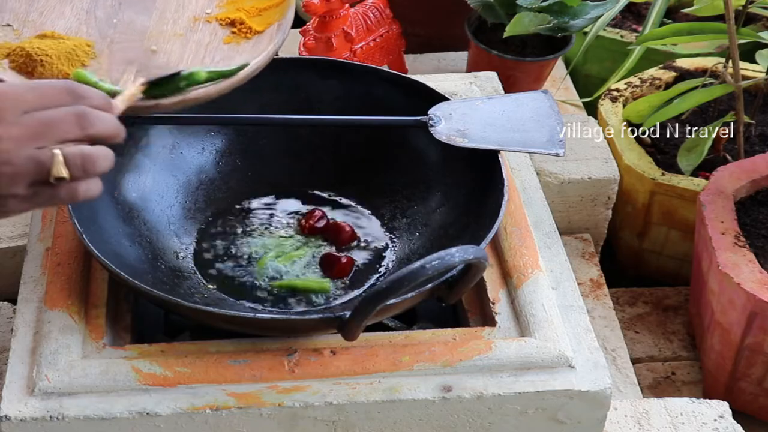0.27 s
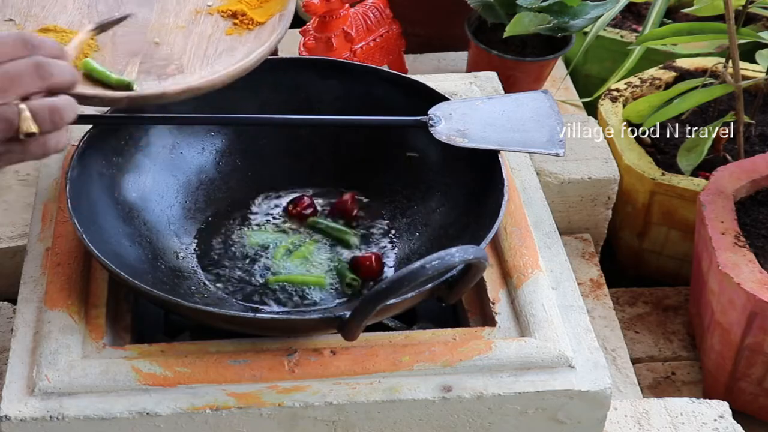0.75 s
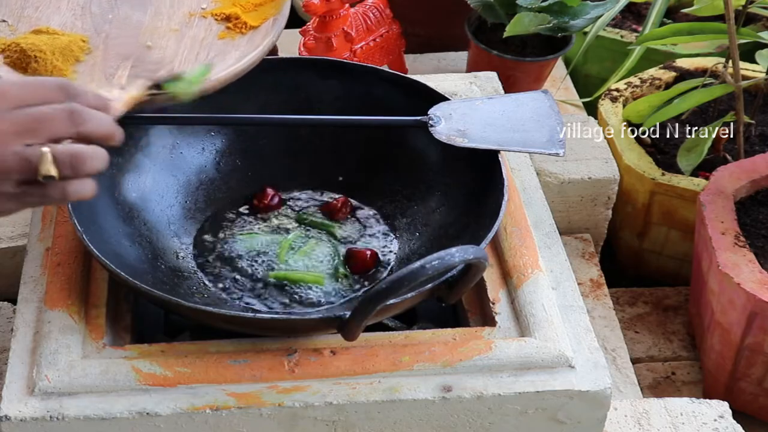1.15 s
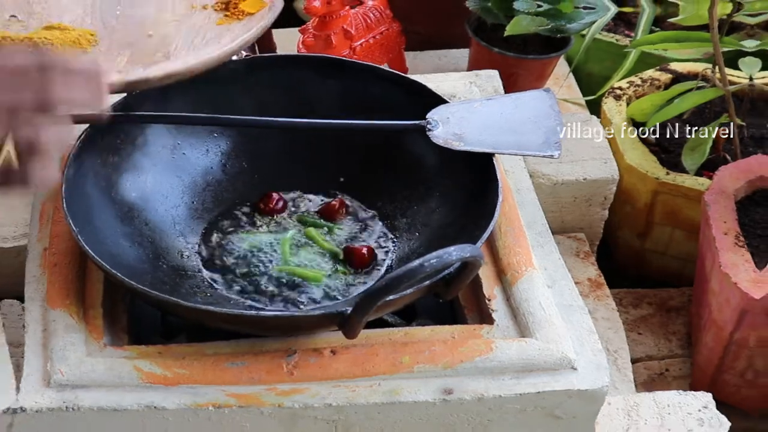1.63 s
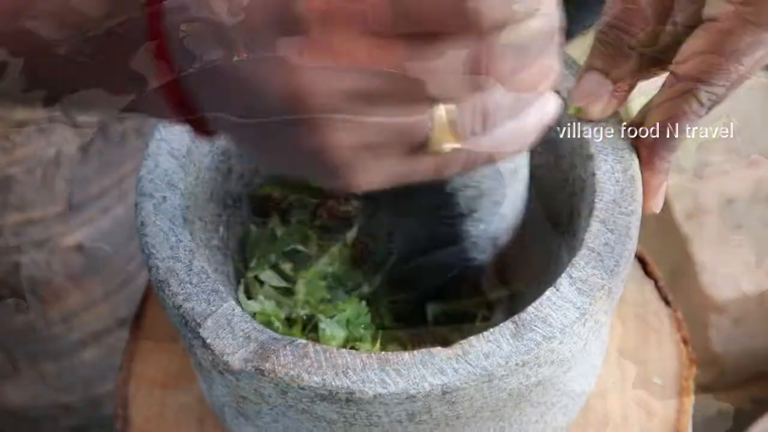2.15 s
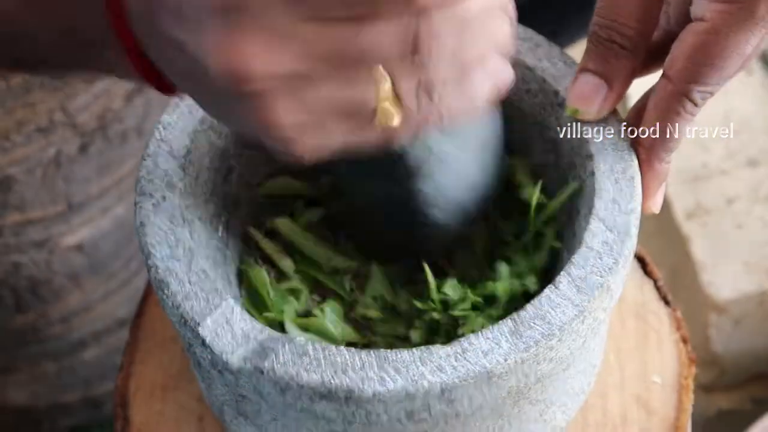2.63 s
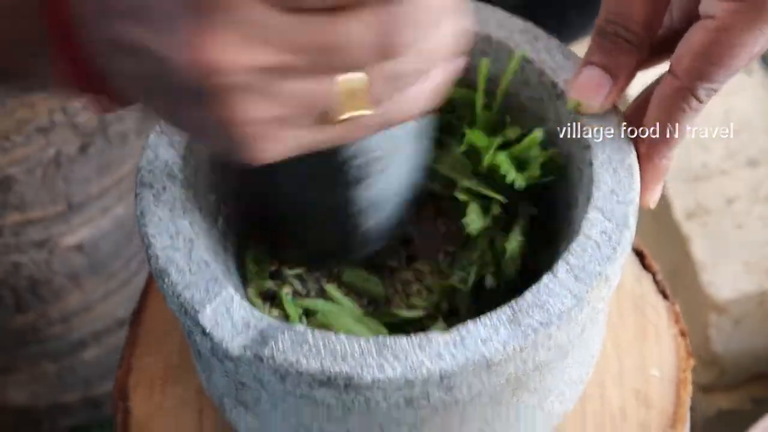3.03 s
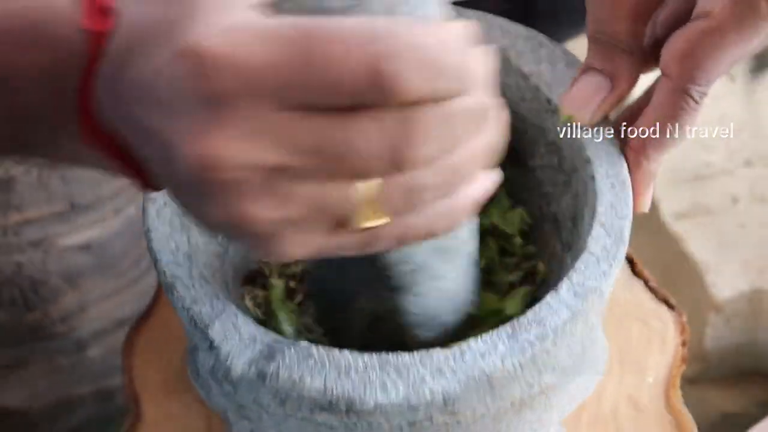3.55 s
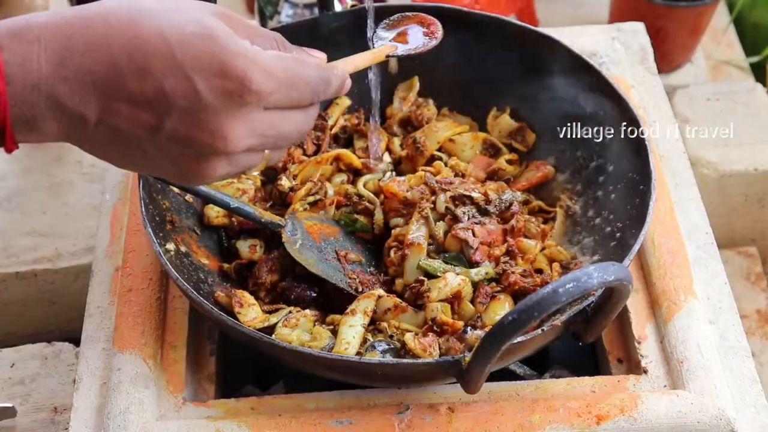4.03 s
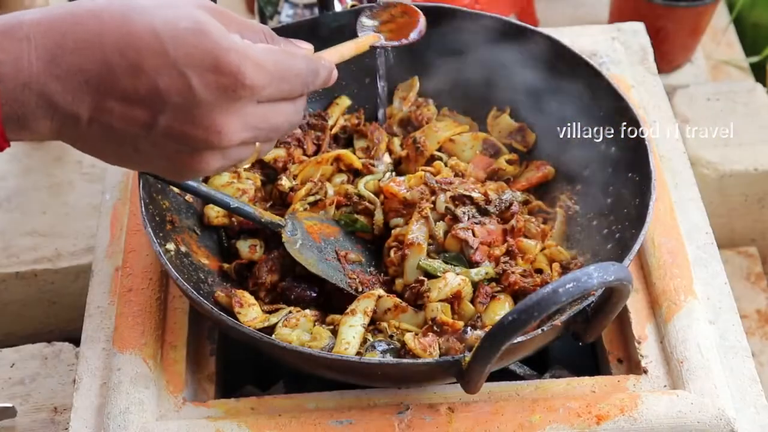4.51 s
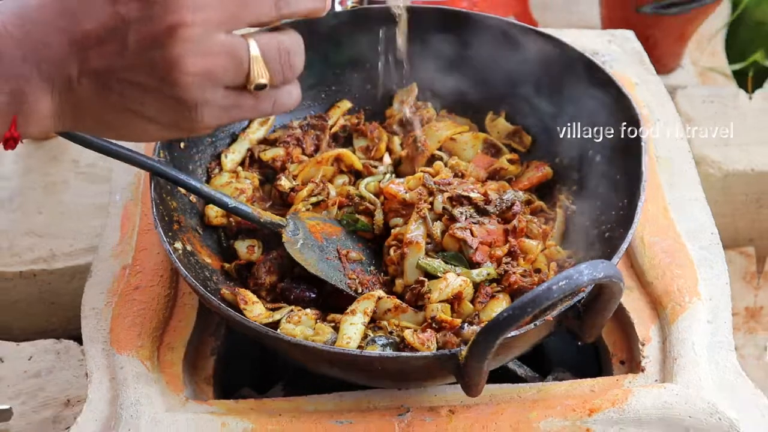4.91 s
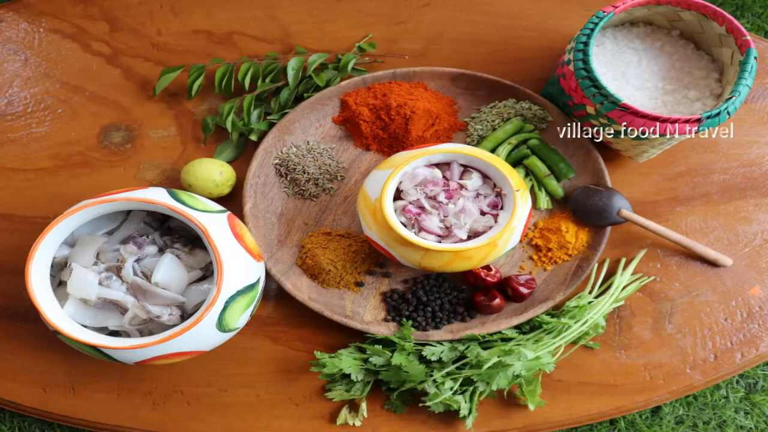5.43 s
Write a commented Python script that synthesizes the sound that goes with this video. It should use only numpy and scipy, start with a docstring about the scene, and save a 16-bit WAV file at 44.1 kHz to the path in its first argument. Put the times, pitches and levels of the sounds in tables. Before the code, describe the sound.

A close stereo microphone in an open yard first catches fine sizzling and dozens of hard, ringing pops, with two wooden taps and short squeaky drags over faint engine throbbing. A dissolve brings slow pestle blows, first dull and leafy, then hard ringing stone, clipping the microphone. Finally a dense steam hiss swells in, stays steady and fades into near silence.

```python
"""Chillies spit in hot oil in an iron wok: noise-burst sizzle plus ringing pops. A spoon taps and drags on
a wooden plate (struck modes, squeak) while something like a small engine throbs far away (a boom per firing).
Then a stone pestle pounds herbs in a mortar (crunch noise, struck modes), hard enough to overload the
microphone. Last, water poured into the hot wok hisses (three bands of noise bursts) and fades out.
Rumble, air, a drone and a hum lie behind. All three scenes are outdoors and dissolve into one another."""
import sys
import numpy as np
from scipy import signal
from scipy.fft import rfft, irfft, next_fast_len
from scipy.io import wavfile

SR = 44100
rng = np.random.default_rng(int(sys.argv[2]) if len(sys.argv) > 2 else 0)


def generate_wav(sig):
    """Save sig (samples, or channels by samples) to the path in sys.argv[1] as 16-bit PCM at SR."""
    pcm = np.round(np.clip(np.atleast_2d(sig).T, -1, 1) * 32767).astype(np.int16)
    wavfile.write(sys.argv[1], SR, pcm)


N = 250124
T = np.arange(N) / SR

# Scene dissolves: start and end in seconds.
TO_MORTAR_S, TO_WATER_S, FADE_OUT_S = (1.71, 2.42), (3.565, 4.21), (4.857, 5.347)
TOP_HZ = 15900

# Side relative to mid at the microphone pair. Each row: frequency in Hz, level in dB.
WIDTH_HZ_DB = [(60, -15.5), (250, -12.5), (1000, -9), (4000, -6.5), (8000, -4.5), (13000, -2)]

# Outdoor background, one row per scene (frying, mortar, pouring): rumble in dB, air in dB.
YARD_DB = [(-56, -46.5), (-54, -49.5), (-61, -49)]
# Spectrum of the low rumble. Each row: frequency in Hz, relative level in dB.
RUMBLE_HZ_DB = [(15, 6), (30, 7.5), (55, 7.5), (75, 0.5), (105, 5), (140, -10.5), (250, -46.5)]
# Spectrum of the open air. Each row: frequency in Hz, relative level in dB.
AIR_HZ_DB = [(60, -20.5), (110, -4.5), (200, -4.5), (300, -4.5), (380, -9), (500, -4.5), (800, -8.5),
             (1500, -9), (4000, -38)]
# Gusts of low rumble. Each row: centre in seconds, length in seconds, level in dB.
GUSTS = [(.9, .3, -51), (1.9, .08, -45), (2.25, 0.31, -40), (2.58, 0.22, -38.5), (2.97, 0.099, -44.5),
         (3.45, .2, -51)]
# Swell of a faint distant drone. Each row: centre in seconds, length in seconds, level in dB.
DRONE_SWELLS = [(3.35, 0.45, -42)]
HUM_DB = -59.5

# Distant one-cylinder engine, gathering speed evenly.
FIRINGS_PER_S, SPEED_UP_PER_S2, ENGINE_DB = 20.3, 2.45, -36.5
ENGINE_AWAY_S = (1.61, 2.28)  # dies away: start, end
# The engine labours. Each row: centre in seconds, length in seconds, level in dB.
SURGES = [(1.06, 0.37, -33.5), (1.57, 0.19, -35)]

# Light wooden bump as the pouring starts.
BUMP_S, BUMP_DB = 3.922, -28.5
# The wooden block thumps low under two of the blows. Each row: start in seconds, level in dB.
THUMPS = [(2.524, -29.5), (3.133, -26)]
# Modes of the wooden block. Each row: frequency in Hz, relative level in dB, t60 in seconds.
BLOCK_MODES = [(58, 2, 0.077), (105.4, -3, 0.045)]

# Spectrum of water flashing to steam. Each row: frequency in Hz, relative level in dB.
STEAM_HZ_DB = [(150, -33), (300, -35), (450, -18), (650, -14), (900, -11), (1200, -4.5), (1750, -4.5),
               (2100, -6), (2600, -1.5), (4200, -2), (6500, -5.5), (9400, -10), (11000, -18),
               (13000, -18.5), (15800, -30.5)]
# Iron wok resonances that colour the boiling. Each row: frequency in Hz, width in Hz, boost in dB.
WOK_PEAKS = [(666.5, 11, 12), (1175, 37, 4), (1520, 25, 4), (1820, 41, 6.5), (2376, 120, 4.5)]
# Steam layers: dB when the pour is in full flow, dB per s as water gathers.
SPRAY, SEETHE, BOIL = (-21, -0.76), (-26.5, 3.7), (-31, 4.8)

# Spectrum of rustling leaves. Each row: frequency in Hz, relative level in dB.
HERB_HZ_DB = [(120, -33.5), (200, 4), (490, -12), (567, -14), (848, 0), (1220, -7.5), (1440, -2),
              (4640, 2.5), (9820, -6.5), (15800, -22)]
# Rubs of the pestle through the herbs. Each row: centre in seconds, length in seconds, level in dB.
RUBS = [(2.515, 0.01, -31), (2.618, 0.038, -27.5), (2.69, 0.058, -38), (2.757, 0.019, -26),
        (2.85, 0.056, -34), (2.95, 0.036, -32), (3.005, 0.043, -33.5), (3.055, 0.033, -33),
        (3.115, 0.025, -35), (3.285, 0.055, -36), (3.36, 0.023, -30.5), (3.47, 0.08, -34),
        (3.64, 0.075, -40)]
# Stalks snapping under the pestle. Each row: start in seconds, level in dB.
SNAPS = [(2.716, -16), (3.4622, -12), (3.4947, -15.5)]
# Leaves stir faintly before they are bruised and audibly after.
FRESH_DB, BRUISED_DB, BRUISED_FROM_S = -60, -43.5, 2.51

# Pestle blows. Each row: start in seconds, leaf crunch in dB, cushioned thud in dB, stone clack in dB,
# pestle ring in dB, highest Hz that the leaf cushion passes, highest Hz of the clack.
BLOWS = [(2.0262, -6, -2.5, -42, -61, 955, 9000), (2.2586, -8, 0, -15, -61, 1700, 2000),
         (2.521, -6, -12.5, -62.5, -56, 445, 9000), (2.7592, -22, -11.5, 9, -19.5, 1600, 11000),
         (3.134, -29.5, -12, 8.5, -14, 2100, 13000), (3.531, -15, -10.5, 5.5, -26.5, 1250, 2400)]
# Modes of the mortar on its wooden block. Each row: frequency in Hz, relative level in dB, t60 in seconds.
THUD_MODES = [(157.8, -22, .12), (275, -5.5, 0.021), (392, -5, 0.027), (511, -8, 0.025), (871, -4, 0.016)]
# Modes of stone on stone. Each row: frequency in Hz, mean relative level in dB, t60 in seconds.
CLACK_MODES = [(736, -28, 0.034), (1250, -7, 0.015), (1383, -6, .018), (1525, -2.5, 0.015),
               (1642, -3, 0.014), (1817, -5, 0.016), (2130, -10.5, 0.014), (2620, -6.5, 0.0067),
               (4750, -17, 0.0059), (5480, -15.5, 0.012), (6460, -20.5, 0.019)]
# Modes of the pestle. Each row: frequency in Hz, relative level in dB, t60 in seconds.
PESTLE_MODES = [(3980, -6.5, 0.27), (3957, 11.5, 0.04)]

# Modes of the wooden plate. Each row: frequency in Hz, relative level in dB, t60 in seconds.
PLATE_MODES = [(871, -2, 0.087), (992, -2, .05), (1530, -1, 0.051), (1875, 0, 0.096), (2694, 12.5, 0.012),
               (3560, -3, 0.0077)]
# Spoon taps. Each row: start in seconds, level in dB.
TAPS = [(.212, -24), (0.5328, -21)]
# Drags of the spoon over the plate. Each row: centre in seconds, length in seconds, level in dB.
DRAGS = [(1.058, 0.027, -34), (1.105, .04, -38), (1.185, .04, -29.5), (1.297, .022, -31)]

# Spectrum of the sizzle. Each row: frequency in Hz, relative level in dB.
FRY_HZ_DB = [(200, -32.5), (400, -14.5), (650, -9.5), (1000, -15.5), (2000, -6.5), (3000, -4), (4300, 1),
             (6500, -2.5), (9000, -4.5), (11000, -11), (14000, -16.5), (16000, -33)]
# Loudest drops of moisture bursting in the oil. Each row: start in seconds, level in dB, pitch in Hz,
# width in Hz.
POPS = [(.0182, -8, 3270, 150), (.056, -6, 2180, 2000), (.06, -6.5, 4500, 600), (.1088, -6.5, 8000, 2320),
        (0.3447, -5.5, 2420, 745), (.351, 1.5, 4200, 1440), (.4321, 0, 3400, 1120),
        (.4655, -9.5, 2200, 694), (0.503, -6.5, 4740, 400), (0.5765, 2.5, 2190, 650),
        (0.7024, -8.5, 4200, 1094), (0.7108, -5.5, 3030, 448), (.7537, -9, 5980, 250),
        (0.8146, -6.5, 5030, 151), (0.834, -2, 5230, 2800), (0.8782, -3, 3450, 800), (.9, -6.5, 3100, 700),
        (1.0208, -4, 3840, 2000), (1.204, -10, 4700, 400), (1.2173, -4.5, 2960, 350),
        (1.305, -3.5, 4800, 1107), (1.311, 2.5, 4040, 800), (1.372, -4.5, 5250, 397),
        (1.4136, -4.5, 6200, 596), (1.5076, -2, 4200, 600), (1.5425, -4.5, 6650, 2510),
        (1.5688, -6, 4100, 1206), (1.6164, -3, 3900, 800), (1.66, -7.5, 2530, 704), (1.6998, -7, 3940, 550),
        (1.714, -6.5, 2480, 497), (1.779, -8.5, 3460, 550), (1.792, -4.5, 6330, 684),
        (1.8247, -1, 3960, 1400), (1.895, -7, 4000, 250), (1.914, -9.5, 2960, 353), (1.964, -7, 3980, 500),
        (2.0756, -12, 4060, 509), (2.1035, -12.5, 4000, 402), (2.1595, -12.5, 2860, 912)]
# Sizzle flares as wet chillies meet the oil. Each row: start in seconds, strength in dB before the sizzle trim.
FLARES = [(.01, -33), (.535, -24.5), (.69, -30), (.85, -23), (1.12, -28.5)]
SPICES_DB = -36  # strength without flares, before the sizzle trim
FLARE_ATTACK_S, FLARE_DECAY_S = 0.019, 0.056
SIMMER_DB, DRYING_S = -7.5, 4.4  # what lasts of each flare, and how slowly it dries up


def undb(db):
    """Decibels to gain."""
    return 10 ** (np.asarray(db) / 20)


def colour(x, points):
    """Filter by a (Hz, dB) spectrum, interpolated over log frequency."""
    hz, db = np.transpose(points)
    size = next_fast_len(N, True)
    bins_hz = np.maximum(np.fft.rfftfreq(size, 1 / SR), 1)
    gain = undb(np.interp(np.log(bins_hz), np.log(hz), db))
    return irfft(rfft(x, size) * gain, size)[..., :N]


def band(x, low_hz, high_hz):
    """Band-pass."""
    edges_hz = [low_hz, min(high_hz, .45 * SR)]
    return signal.sosfilt(signal.butter(2, edges_hz, 'band', fs=SR, output='sos'), x)


def unit(x, low_hz, high_hz):
    """Scale so that this band of the centre has rms 1."""
    centre = np.atleast_2d(x).mean(axis=0)
    return x / band(centre, low_hz, high_hz).std()


def walk(knots_per_s):
    """Random drift, spread near 1, straight between knots."""
    knots_s = np.arange(0, T[-1] + 1, 1 / knots_per_s)
    return np.interp(T, knots_s, rng.standard_normal(len(knots_s)))


def add(track, start_s, sound):
    """Mix a sound into a track."""
    i = max(int(start_s * SR), 0)
    track[..., i:i + sound.shape[-1]] += sound[..., :N - i]


def fade(span_s):
    """Smooth rise from 0 to 1 over (start, end)."""
    return np.sin(np.pi / 2 * np.interp(T, span_s, [0, 1])) ** 2


def shots():
    """Gains of the frying, mortar and pouring scenes."""
    first, second = fade(TO_MORTAR_S), fade(TO_WATER_S)
    return 1 - first, first * (1 - second), second * (1 - fade(FADE_OUT_S))


def strokes(rows, base=0):
    """Gain of bell-shaped swells (centre s, length s, dB), power-summed with a base gain."""
    power = base ** 2
    for centre_s, length_s, db in rows:
        power = power + undb(db) ** 2 * np.exp(-(2 * (T - centre_s) / length_s) ** 2)
    return np.sqrt(power)


def ring(modes):
    """Impulse response of (Hz, dB, t60 s) modes; neighbours start in opposite directions."""
    t = T[:SR // 2]
    out = np.zeros(len(t))
    for k, (hz, db, t60_s) in enumerate(modes):
        decay = np.exp(-np.log(1000) * t / t60_s)
        out += (-1) ** k * undb(db) * np.sin(2 * np.pi * hz * t) * decay
    return out


def noise(points, envelope=1):
    """Stereo noise of a given spectrum, wider towards the treble."""
    mid, side = rng.standard_normal((2, N)) * envelope
    side = colour(side, WIDTH_HZ_DB)
    return colour(np.array([mid + side, mid - side]), points)


def fizz(points, bursts_per_s, spread_db):
    """Stream of tiny noise bursts of unequal size, each decaying within about a millisecond."""
    sizes_db = spread_db * np.minimum(rng.exponential(size=N), 5)
    bursts = (rng.random(N) < bursts_per_s / SR) * undb(sizes_db)
    power = signal.lfilter([1], [1, -np.exp(-1 / (0.00019 * SR))], bursts ** 2)
    return noise(points, np.sqrt(power))


def echoes(x, wet_db, t60_s, delay_s, side_db):
    """Dense scattered reflections that start after a delay and differ between the channels."""
    t = T[:SR // 2]
    mid, side = rng.standard_normal((2, len(t))) * np.exp(-np.log(1000) * t / t60_s) * (t > delay_s)
    response = mid + undb(side_db) * np.array([side, -side])
    response *= undb(wet_db) / np.sqrt(np.sum(mid ** 2))
    return signal.fftconvolve(np.atleast_2d(x), response, axes=1)[:, :N]


def pop(db, hz, width_hz, pan, bowl_db=-8, bowl_s=0.0098):
    """A steam bubble tears open with a snap and its cavity rings; the bowl scatters it at random."""
    t = T[:SR // 30]
    cavity = (1 - np.exp(-t * hz / 0.25)) * np.exp(-np.pi * width_hz * t)
    # the more violent the tear, the shorter the ring and the stronger the snap
    snap = undb(-10.5) * width_hz / 1500 * rng.standard_normal(len(t)) * np.exp(-t / 0.00031)
    burst = cavity / cavity.max() * np.sin(2 * np.pi * hz * t) + snap
    left, right, shared = rng.standard_normal((3, len(t))) * np.exp(-t / bowl_s) * (t > .0007)
    bowl = np.array([left + shared, right + shared])
    bowl *= undb(bowl_db) / np.sqrt(np.sum(bowl[0] ** 2))
    scattered = signal.fftconvolve(burst[None], bowl, axes=1)[:, :len(t)]
    panned = burst * undb(3.04 * pan * np.array([[1], [-1]]))
    return undb(db) * (panned + scattered)


def yard(hum_hz=102, drone_hz=(290, 620)):
    """Filtered noise as low rumble, open air and a far drone, plus a wavering sine hum in the last scene."""
    gains = np.array(shots())
    rumble_gain, air_gain = undb(YARD_DB).T @ gains
    rumble = unit(noise(RUMBLE_HZ_DB), 28, 100) * strokes(GUSTS, rumble_gain)
    air = unit(noise(AIR_HZ_DB), 170, 700) * air_gain
    drone = unit(band(rng.standard_normal(N), *drone_hz), 170, 700) * strokes(DRONE_SWELLS)
    pitch_hz = hum_hz * (1 + 0.0408 * walk(12))
    hum = np.sqrt(2) * np.sin(2 * np.pi * np.cumsum(pitch_hz) / SR)
    hum = hum * undb(HUM_DB + 2 * walk(12)) * gains[2]
    return rumble + air + drone + hum


def engine(boom_hz=165, wall_s=0.01782, wall_db=-13):
    """Each firing booms briefly in the exhaust, never twice alike; a wall sends it back."""
    running = T < ENGINE_AWAY_S[1]
    turns = np.floor(FIRINGS_PER_S * T + SPEED_UP_PER_S2 * T ** 2 / 2)
    firings_s = T[(np.diff(turns, prepend=-1) > 0) & running]
    boom = np.zeros(N)
    for start_s, (strength, detune) in zip(firings_s, rng.standard_normal((64, 2))):
        add(boom, start_s, undb(1.3 * strength) * ring([(boom_hz * (1 + .04 * detune), 0, .05)]))
    boom = band(boom, 118, 212)
    boom = boom + undb(wall_db) * np.interp(T - wall_s, T, boom, left=0)
    boom = boom + echoes(boom, wet_db=-7, t60_s=0.18, delay_s=0.049, side_db=-15)
    level = strokes(SURGES, undb(ENGINE_DB)) * (1 - fade(ENGINE_AWAY_S))
    return boom / boom[:, running].std() * level


def wooden_knocks():
    """Dull knocks of wood as quickly damped modes: the bump and the block's thumps."""
    out = np.zeros(N)
    add(out, BUMP_S, undb(BUMP_DB) * ring([(262, 0, 0.032), (420, 0.0024, .03), (635, 0, .03)]))
    for start_s, db in THUMPS:
        add(out, start_s, undb(db) * ring(BLOCK_MODES))
    return out


def steam():
    """Countless droplets boil off the iron; the hiss deepens as water gathers and larger bubbles form."""
    raw = fizz(STEAM_HZ_DB, bursts_per_s=14000, spread_db=2.0)
    hiss = raw
    for hz, width_hz, boost_db in WOK_PEAKS:
        resonance = signal.lfilter(*signal.iirpeak(hz, hz / width_hz, fs=SR), raw)
        hiss = hiss + (undb(boost_db) - 1) * resonance
    low = colour(hiss, [(1400, 1.0), (1850, -11.5), (2600, -40.0)])
    high = colour(hiss, [(2500, -40.0), (3400, -1.0), (4400, 0.5)])
    boil = unit(low, 500, 1770)
    seethe = unit(hiss - low - high, 1900, 3500)
    spray = unit(high, 3620, 12000)
    poured_s = T - TO_WATER_S[1]
    out = np.zeros((2, N))
    for layer, (db, db_per_s) in ((boil, BOIL), (seethe, SEETHE), (spray, SPRAY)):
        out += layer * undb(db + db_per_s * poured_s + .5 * walk(25))
    return shots()[2] * out


def herbs():
    """Wet leaves rustle (noise bursts) as the pestle lifts and turns; now and then a stalk snaps."""
    stir_gain = undb(np.where(T < BRUISED_FROM_S, FRESH_DB, BRUISED_DB))
    rubbing = strokes(RUBS, stir_gain) * shots()[1]
    out = unit(fizz(HERB_HZ_DB, bursts_per_s=11000, spread_db=3.0), 4100, 12000) * rubbing
    for start_s, db in SNAPS:
        add(out, start_s, pop(db, hz=4000, width_hz=2600, pan=0))
    return out


def spoon(squeak_hz=872, squeak_db=-1, drag_db=0):
    """Taps ring the plate's modes; drags are random slips plus an unsteady squeak near its lowest mode."""
    pressure = strokes(DRAGS)
    pitch_hz = squeak_hz * (1 + .03 * walk(120))
    squeak = np.sqrt(2) * np.sin(2 * np.pi * np.cumsum(pitch_hz) / SR)
    out = squeak * undb(squeak_db + 3 * walk(70.7)) * pressure
    slips = rng.standard_normal(N) * (rng.random(N) < 500 / SR)  # 500 per s
    drag = signal.fftconvolve(slips, ring(PLATE_MODES))[:N]
    out += undb(drag_db) * drag / drag.std() * pressure
    for start_s, db in TAPS:
        add(out, start_s, undb(db) * ring(PLATE_MODES))
    return out + echoes(out, wet_db=-7.5, t60_s=0.39, delay_s=.004, side_db=-4)


def mortar(crush_s=0.0016, crush_lead_s=.002):
    """The pestle first crushes leaves and thuds; once they are flat, stone meets stone and rings."""
    crunch, thuds, clacks, rings = np.zeros((4, N))
    t = T[:SR // 12]
    centre_s = t[-1] / 2
    from_centre_s = np.abs(t - centre_s)
    squeeze = np.exp(-from_centre_s / crush_s) + undb(-30) * np.exp(-from_centre_s / .008)
    for start_s, crunch_db, thud_db, clack_db, ring_db, cushion_hz, clack_hz in BLOWS:
        leaves = undb(crunch_db) * squeeze * rng.standard_normal(len(t))
        add(crunch, start_s - crush_lead_s - centre_s, leaves)
        add(thuds, start_s, undb(thud_db) * band(ring(THUD_MODES), 80, cushion_hz))
        # each blow lands on a new spot and weights the stone's modes anew
        stone = ring([(hz, db + 1.2 * rng.standard_normal(), t60_s) for hz, db, t60_s in CLACK_MODES])
        add(clacks, start_s, undb(clack_db) * band(stone, 400, clack_hz))
        add(rings, start_s, undb(ring_db) * ring(PESTLE_MODES))
    crunch = band(crunch, 2500, 8600)
    direct = thuds + clacks + crunch + rings * undb(np.array([[1], [-1]]) * 5.3)  # ring to the left
    near = echoes(band(clacks, 1200, 9000), wet_db=-8, t60_s=.022, delay_s=.0006, side_db=-1)
    # the yard keeps the low thuds longer than the bright clacks
    bright = band(clacks, 700, 2800) + crunch
    bright_tail = echoes(bright, wet_db=-10.5, t60_s=0.37, delay_s=0.0015, side_db=0.0)
    low_tail = echoes(thuds, wet_db=-6.0, t60_s=0.39, delay_s=0.0045, side_db=-10)
    return direct + near + bright_tail + low_tail


def frying_strength():
    """Each flare rises fast, dies down and leaves the oil livelier than before."""
    power = undb(SPICES_DB) ** 2
    for start_s, db in FLARES:
        age_s = np.maximum(T - start_s - FLARE_ATTACK_S, 0)
        simmer = undb(SIMMER_DB) * np.exp(-age_s / DRYING_S)
        tail = np.hypot(np.exp(-age_s / FLARE_DECAY_S), simmer)
        power = power + (undb(db) * fade((start_s, start_s + FLARE_ATTACK_S)) * tail) ** 2
    return np.sqrt(power) * shots()[0]


def oil(small_db=4, spread_db=3.5, sizzle_trim_db=-2.0, count=400):
    """Moisture bursts in hot oil: fine sizzle of noise bursts, many small pops and the loud spits."""
    strength = frying_strength()
    spits = np.zeros((2, N))
    for when, size, pitch, damping in rng.random((count, 4)):
        start_s = when * TO_MORTAR_S[1]
        db = small_db - spread_db * np.log(max(size, .09))  # over the sizzle strength
        small = pop(db, 2400 * 3.2 ** pitch, 150 * 6 ** damping, rng.standard_normal())
        add(spits, start_s, strength[int(start_s * SR)] * small)
    for start_s, db, hz, width_hz in POPS:
        add(spits, start_s, pop(db, hz, width_hz, rng.standard_normal()))
    sizzle = unit(fizz(FRY_HZ_DB, bursts_per_s=6100, spread_db=4.0), 2200, 12000)
    sizzle = sizzle * strength * undb(walk(25) + sizzle_trim_db)
    return sizzle + spits + echoes(spits, wet_db=-9.5, t60_s=0.22, delay_s=0.0034, side_db=-5.0)


def scene():
    """All sources together."""
    background = yard() + engine() + wooden_knocks()
    return background + steam() + herbs() + spoon() + mortar() + oil()


def record(dry):
    """Overload clips flat at full scale; a steep low-pass cuts the top."""
    low_pass = signal.ellip(10, .1, 70, TOP_HZ, fs=SR, output='sos')
    return signal.sosfilt(low_pass, np.clip(dry, -1, 1))


dry = scene()
out = record(dry)
generate_wav(out)
```